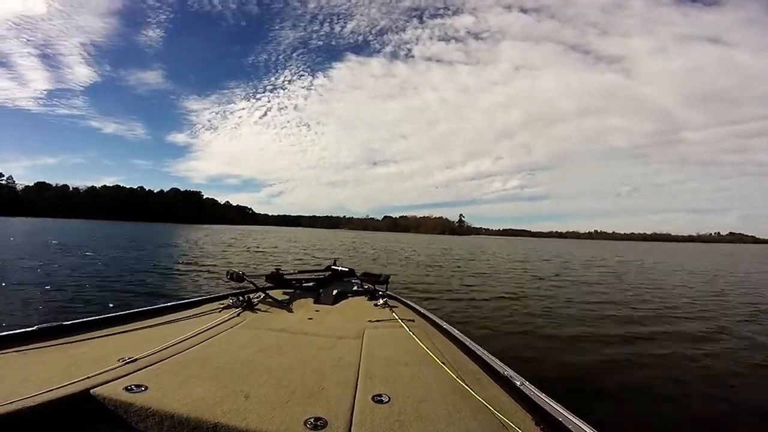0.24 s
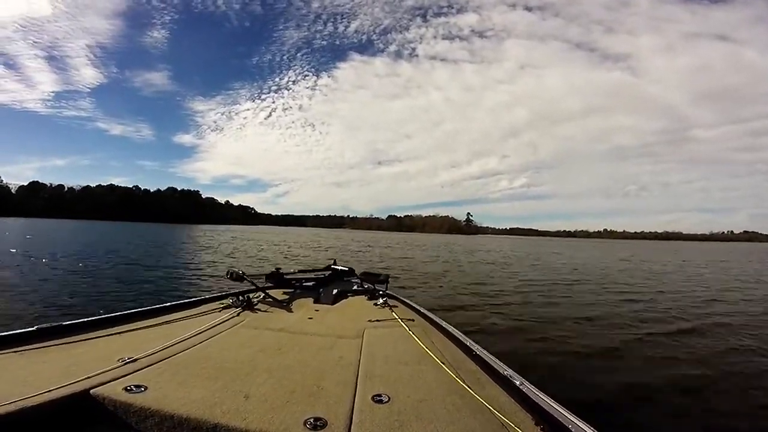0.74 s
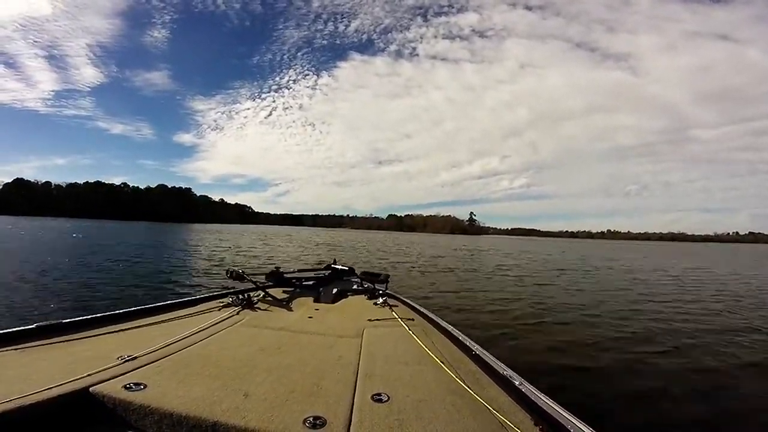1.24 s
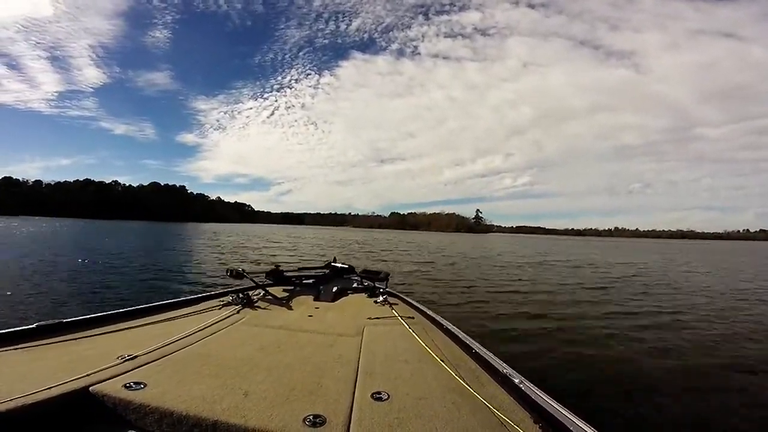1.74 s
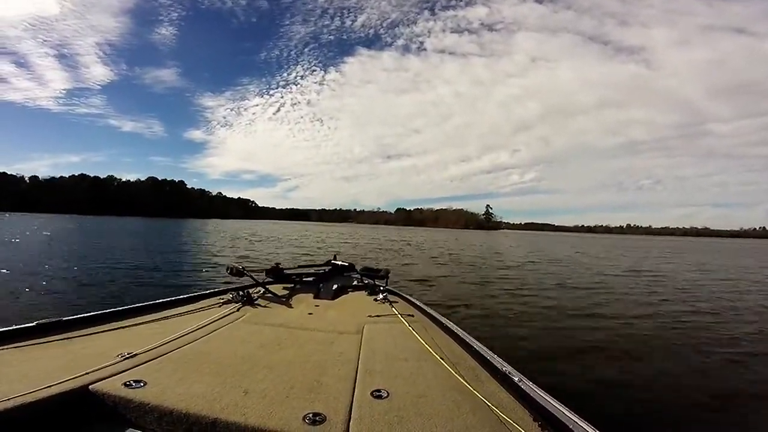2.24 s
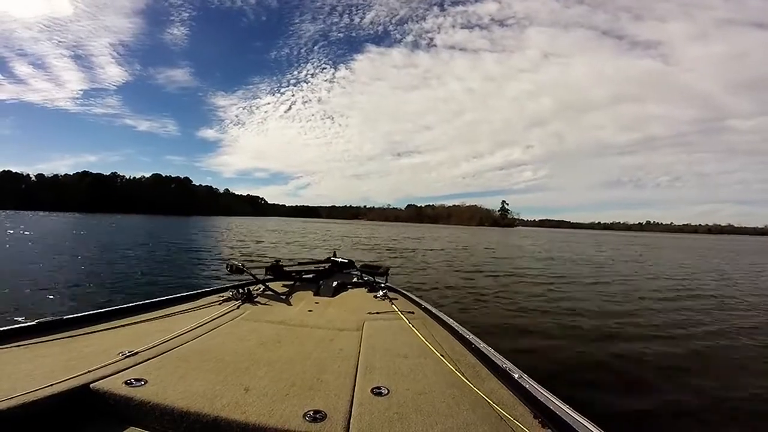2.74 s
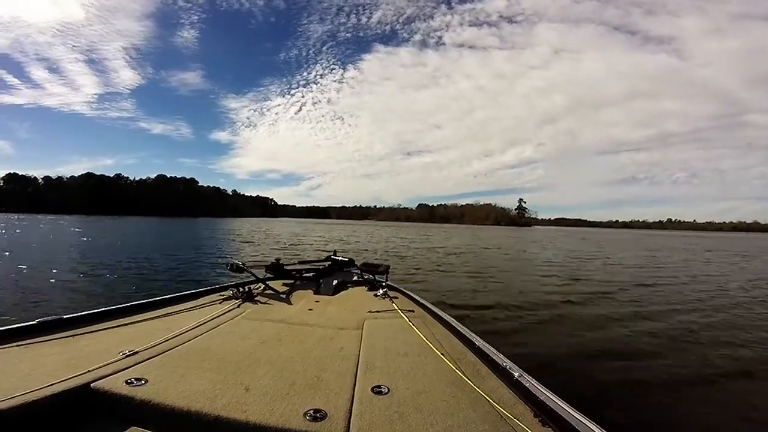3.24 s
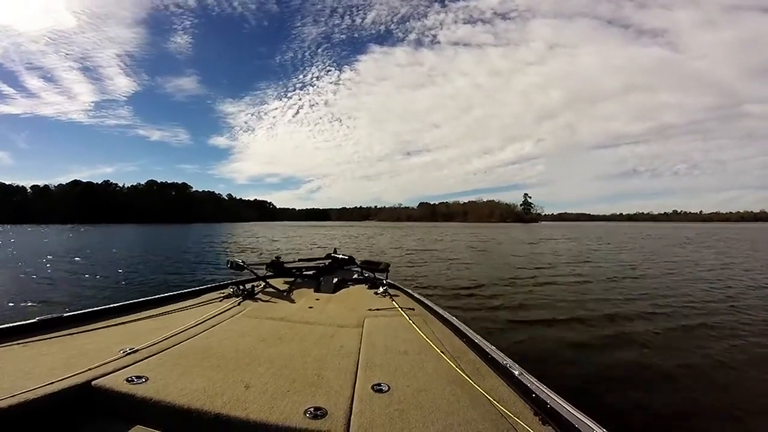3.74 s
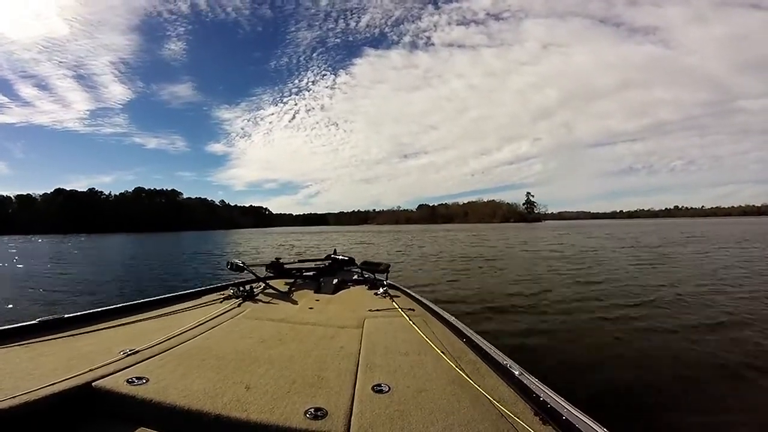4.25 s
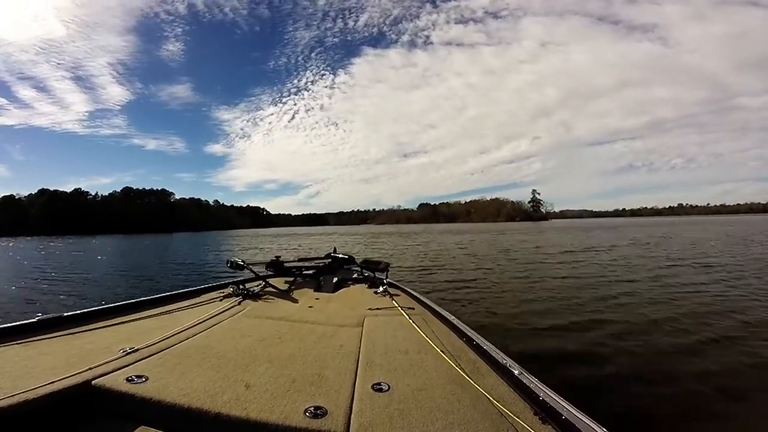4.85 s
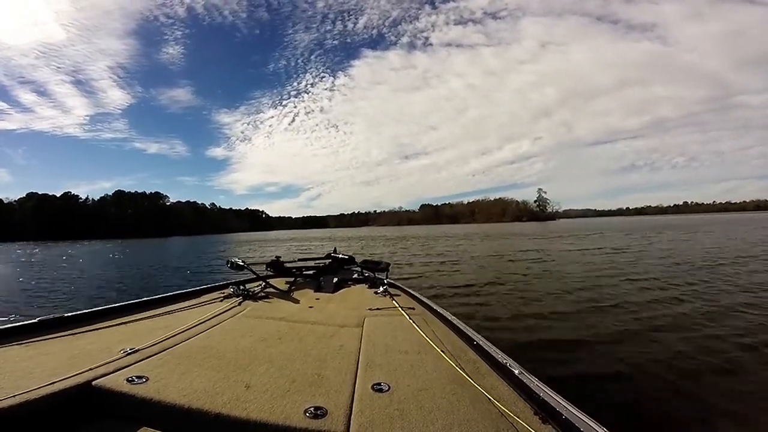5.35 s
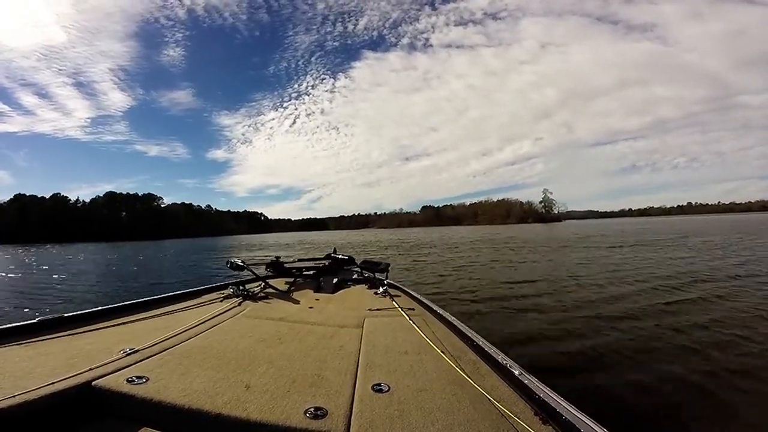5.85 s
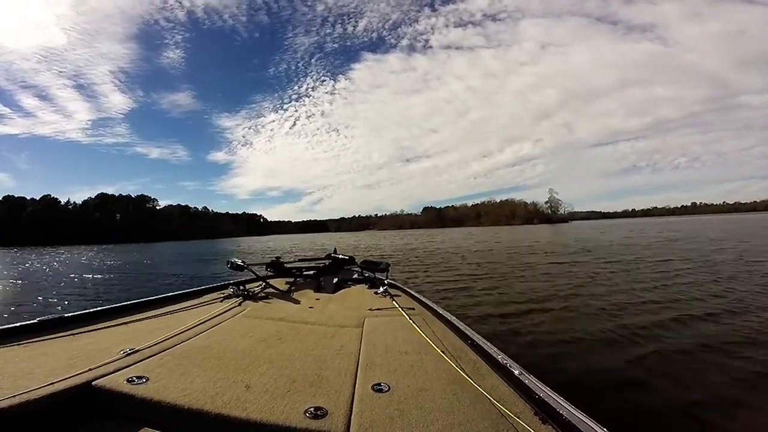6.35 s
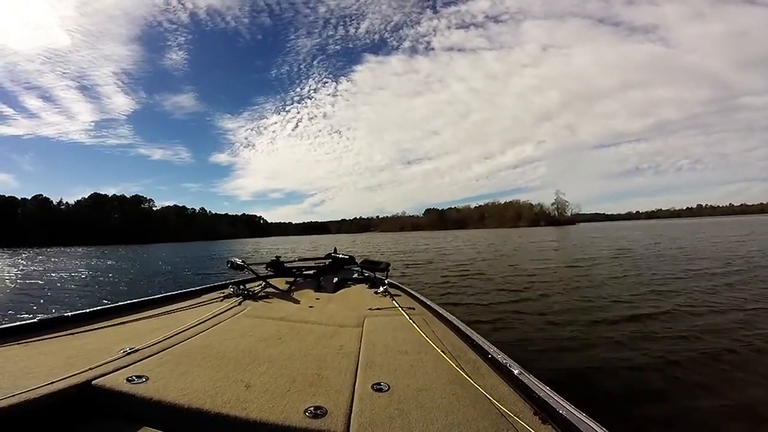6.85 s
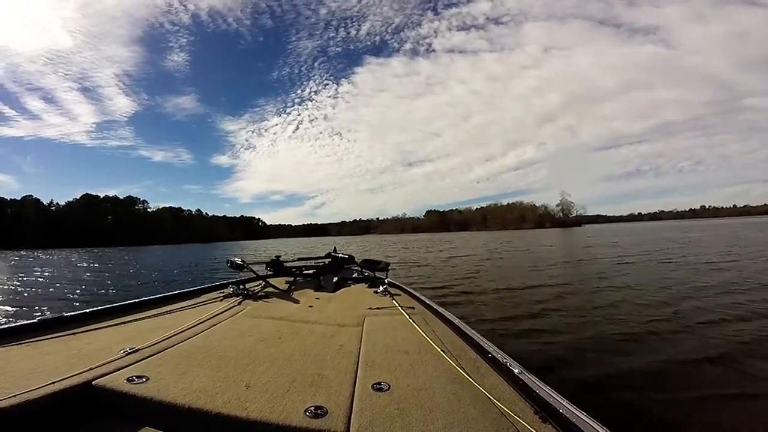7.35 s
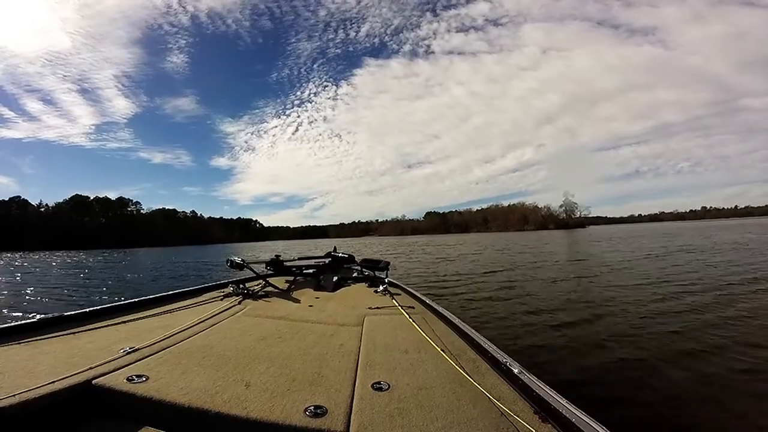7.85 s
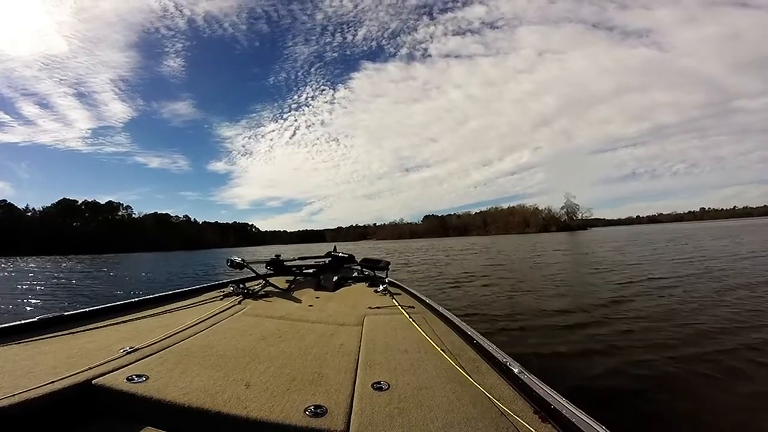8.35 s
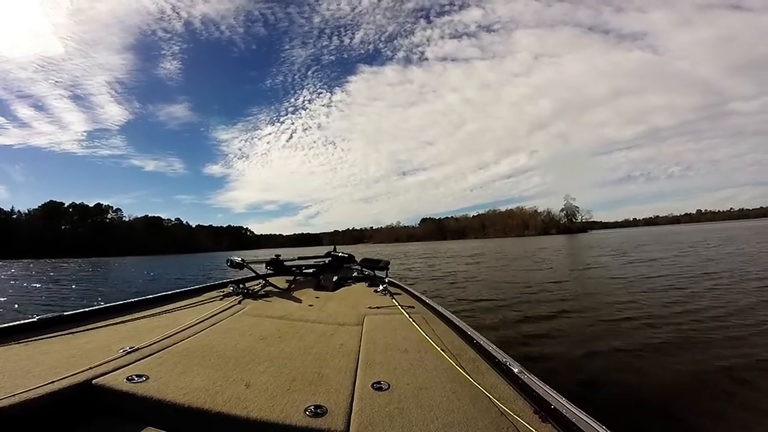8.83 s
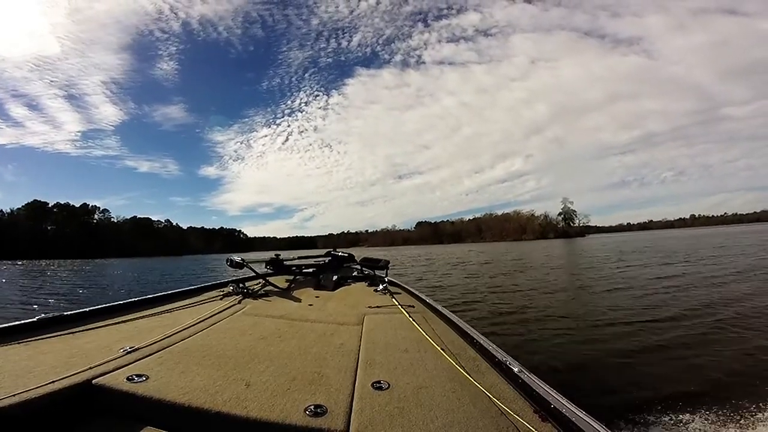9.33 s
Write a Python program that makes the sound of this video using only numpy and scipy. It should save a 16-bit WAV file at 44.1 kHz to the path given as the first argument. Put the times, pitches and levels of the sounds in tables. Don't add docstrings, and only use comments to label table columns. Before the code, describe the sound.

A fast boat slows on a lake. First a steady, boomy motor drone and uneven hard rattles, with faint hiss. Around a second and a half the pitch sags, and the engine soon fades. Waves then thud and ring through the hull in uneven low swells, with rushing water, sharp ticks of drops and gusty wind above. Late on, the wind eases and splashes come one by one. Close, muffled, hull-mounted microphone, no echo.

```python
import sys
import numpy as np
from scipy import signal
from scipy.fft import rfft, irfft, next_fast_len
from scipy.io import wavfile
from scipy.ndimage import uniform_filter1d, minimum_filter1d, map_coordinates

SR = 44100
rng = np.random.default_rng(int(sys.argv[2]) if len(sys.argv) > 2 else 0)


def wav_out(sig):
    wavfile.write(sys.argv[1], SR, np.round(np.clip(np.atleast_2d(sig).T, -1, 1) * 32767).astype(np.int16))


def natural_amplitude(level_db):
    exponent = np.asarray(level_db, float) / 20
    return 10 ** exponent


N = 422918

# time in seconds, speed in turns per second, loudness in dB.
SHAFT = [(0, 84.05, -31), (.6, 84.2, -27.5), (1.2, 83.6, -29), (1.34, 80.6, -29.5), (1.49, 73.4, -30.5),
         (1.63, 69.3, -33.5), (1.8, 67, -37), (1.95, 65.5, -51), (2.3, 63.3, -50), (2.5, 61.73, -40),
         (3.15, 54.5, -34), (3.9, 48, -69)]
# multiple of the shaft speed, level in dB, unsteadiness in dB.
ENGINE_TONES = [
    (1.717, 2.5, .7),
    (2, -3, 1),
    (3, 0, 0.3),
    (3.434, -7, 3),
    (4, 3.5, .6),
    (5, -14, 3),
]
# pitch in Hz, width in Hz, boost in dB.
DECK = [(57, 3.2, -3), (119, 4.1, 5.5), (139, 8.5, 7), (160.9, 10.5, 9.5), (203.9, 17, 6), (256.3, 3.6, 3),
        (280, 14, 0.5)]

# pitch in Hz, width in Hz, level in dB.
GEAR = [(387, 140, -2.5), (637, 110, 4), (774, 110, 0), (1040, 100, -2.5), (1280, 88, 0), (2070, 190, 2.5),
        (2580, 460, -6.5)]
# peak time in seconds, level in dB.
JOLTS = [(0, -30.5), (.18, -38), (.3, -33), (.4, -37), (.5, -34), (.72, -34), (.92, -33), (.97, -36),
         (1.14, -36), (1.3, -32), (1.42, -37)]
# time in seconds, peak in dB.
KNOCKS = [(0.0243, -17), (0.0722, -16), (0.168, -24), (0.179, -15), (0.2743, -25), (0.2967, -21),
          (0.3451, -18), (.358, -19), (0.381, -14), (0.393, -15), (0.4155, -21), (.429, -25), (.453, -23),
          (.489, -25), (0.5237, -26), (0.607, -20), (0.6893, -18), (0.9043, -17), (.916, -21), (0.952, -21),
          (0.9737, -11), (.986, -30), (1.128, -19), (1.141, -16), (1.2376, -30), (1.2495, -16),
          (1.261, -19), (1.287, -17), (1.2975, -17), (1.309, -21), (1.399, -19), (1.411, -22), (1.424, -16)]
JOLT_RISE_S, JOLT_FALL_S, RATTLE_REST_DB = 0.051, 0.052, -39.5

OFF_PLANE_S, SETTLE_S, SKIM_DB = 1.3, 0.4, -9
# start in seconds, length in seconds, level in dB, change along it in dB, pitch in Hz.
DRONE_SWELLS = [(0, 1.43, -11, -2, 85), (1.343, 0.27, -16, -3, 83.8), (1.93, 0.11, -17.5, 1, 86.05),
                (2.164, 0.16, -19, -14, 85.7), (2.339, 0.24, -11.5, 3, 84.5),
                (2.768, 0.51, -21.5, 6.5, 88.35), (3.374, 0.1, -21.5, 2, 88.8), (3.7, 0.17, -19, -0.5, 86),
                (4.048, 0.4, -15.5, 1, 86.6), (4.41, 0.37, -21.5, 4.5, 86.4),
                (4.873, 0.18, -12.5, -2.5, 88.4), (5.31, 0.04, -16.5, 0, 83.9),
                (5.43, 0.18, -16, -3.5, 87.7), (5.622, 0.07, -15.5, 2.5, 89.7),
                (6.092, 0.22, -17, -1.5, 88.6), (6.576, 0.37, -17.5, 1, 87.35), (7.045, 0.14, -22, 3, 86.5),
                (7.3, 0.08, -19.5, -1, 86), (7.488, 0.16, -15, 0.5, 88.2), (7.992, .36, -25, -14, 85.4),
                (8.435, 0.31, -20, 0, 86.7), (8.873, 0.1, -19, -5, 86.9), (9.055, 0.33, -21, 2.5, 86.5), ]
DRONE_RISE_S, DRONE_FALL_S, DRONE_REST_DB = 0.039, 0.027, -29.5

# time in seconds, shudder level in dB.
SEA = [(0, -45.5), (.45, -35.5), (.8, -39.5), (1.6, -39), (2.05, -29), (2.35, -29.5), (2.55, -36.5),
       (3.25, -32.5), (3.6, -29.5), (4.25, -33), (4.85, -27), (5.5, -28.5), (6, -35.5), (6.75, -31.5),
       (7.63, -30.5), (7.75, -39), (8.6, -33.5), (9.59, -39.5)]
# start in seconds, length in seconds, boom level in dB, upper boom above that in dB.
WAVES = [(0, 0.12, -16.5, -2), (.6, 0.29, -10, -10), (1.097, 0.38, -13.5, -9), (2.036, 0.22, -14, -14),
         (2.283, 0.096, -17, -19), (3.29, 0.011, -16, -3), (3.485, 0.19, -21.5, 2),
         (3.787, 0.41, -16, -4.5), (4.35, 0.18, -17.5, -9), (4.915, 0.073, -12, -7),
         (5.077, 0.033, -17, -9), (5.208, 0.17, -15.5, -7), (5.418, 0.075, -13, -5),
         (5.63, 0.11, -16.5, -10), (5.823, 0.067, -13, -1), (5.979, 0.26, -16, -7.5),
         (6.336, 0.07, -19.5, -4), (6.543, 0.14, -15.5, -15), (6.747, 0.46, -17.5, -4),
         (7.149, 0.21, -14.5, -7), (7.417, 0.14, -16, -3), (7.887, 0.069, -17.5, -1), (8.1, 0.033, -23, 4),
         (8.33, 0.42, -18.5, -5), (8.699, 0.09, -16, -5), (8.83, 0.24, -21.5, -9)]
WAVE_RISE_S, WAVE_EBB_S = 0.14, 0.18
BOOM_DB, BOOM_FOLLOWS = -16, 0.14
UPPER_DB, UPPER_FOLLOWS = -21, 0.076
SLAP_DB = -5
# frequency in Hz, level in dB per Hz.
SHUDDER = [(15, -43), (25, -19.5), (40, 0.5), (62, 6), (78, 5), (100, -24), (130, -64.5)]
# frequency in Hz, level in dB per Hz.
BOOM = [(60, -60), (85, -14), (100, 4), (165, -4), (190, -12.5), (240, -72)]
# frequency in Hz, level in dB per Hz.
UPPER_BOOM = [(140, -45), (180, -2), (250, -8), (310, -19.5), (400, -28), (520, -36), (800, -73.5)]

# pitch in Hz, width in Hz, boost (+) or dip (-) in dB.
CASE = [(1929, 98, 8), (2160, 406, -11), (2550, 920, 6.5), (3001, 490, -23.5), (3440, 350, 16.5),
        (3817, 360, -23), (4108, 424, 19), (4770, 270, 9.5), (5104, 430, -12), (6194, 195, 13.5),
        (6270, 89, -9.5), (6624, 226, 21.5), (8230, 190, -3), (8350, 240, 10.5), (10000, 300, -2.5),
        (10570, 280, 11.5), (11500, 250, -10.5)]
# time in seconds, strength in dB, how much it blows from the side from 0 to 1.
WIND = [(0, -54, 0.13), (.88, -54, 0.2), (.97, -57, 0.16), (1.3, -56, 0.28), (2.26, -46, 0.1),
        (2.5, -51.5, 0.18), (3.16, -50, 0.52), (3.46, -53, 0.7), (3.85, -48.5, 0.81), (4.33, -54, 0.83),
        (5.25, -51.5, 0.69), (5.49, -57, 0.75), (5.84, -53.5, 0.82), (6.02, -60.5, 0.86), (6.6, -52, 0.78),
        (7.43, -58.5, 0.67), (7.64, -66, 0.35), (8.44, -61.5, 0)]
# peak time in seconds, strength in dB.
PUFFS = [(.91, -51), (1.0, -63), (1.13, -51.5), (1.3, -52.5), (1.37, -53), (1.44, -55.5), (1.7, -52.5),
         (1.84, -49), (2.26, -58), (3.39, -59.5), (3.7, -53.5), (3.78, -54.5), (3.87, -54.5), (3.97, -48.5),
         (4.02, -46.5), (4.1, -51), (4.62, -60.5), (4.84, -64.5), (5.2, -56), (5.94, -63.5), (6.11, -53),
         (6.45, -56.5), (6.58, -47), (6.63, -58.5), (6.7, -53.5), (6.73, -56), (7.25, -66)]
PUFF_S = 0.015
# frequency in Hz, level in dB per Hz.
ROAR = [(250, -7), (400, 0), (1000, -2.5), (1900, -4.5), (2300, -2), (3500, -36.5), (5000, -54.5)]
# frequency in Hz, level in dB per Hz.
WHISTLE = [(3500, -49), (5000, 2), (6000, -2), (7000, -7), (8000, -10), (10000, -50)]
# frequency in Hz, level in dB per Hz.
HISS = [(5500, -51.5), (7200, -5.5), (9000, 1), (10000, -6.5), (11500, -7.5), (13000, -16), (14200, -22),
        (14800, -22.5), (16000, -34)]
ROAR_DB, ROAR_FOLLOWS, ROAR_ABEAM_DB = -39, 0.78, 2
WHISTLE_OVER_DB, WHISTLE_ABEAM_DB, HISS_OVER_DB = 4, 10, 2

# time in seconds, flow level in dB.
WATER = [(0, -43), (1.04, -43), (1.52, -41), (2.26, -33), (2.47, -38.5), (2.9, -36.5), (3.51, -37),
         (3.85, -35), (4.25, -36), (5.31, -33.5), (5.49, -37.5), (6.16, -38.5), (6.56, -36), (7.32, -36),
         (7.69, -41.5), (8.4, -40), (9.2, -43.5), (9.59, -48.5)]
# peak time in seconds, level in dB, brightness in dB.
SPLASHES = [(4.75, -43, 7), (6.52, -43, 7), (6.85, -49, 7), (7.09, -44, 4), (7.32, -42, 9.5),
            (7.66, -49, 10), (7.78, -50, 6), (7.89, -47.5, 12), (8.0, -45, 8.5), (8.27, -40, 3.5),
            (8.35, -33.5, -10), (8.45, -38, -9), (8.54, -49, -8), (8.75, -35, -8), (8.83, -39.5, 1.5),
            (8.9, -40, 5), (9.23, -40, -11), (9.3, -37, -6), (9.34, -44, -7), (9.42, -41, -18),
            (9.5, -35.5, -17), (9.56, -38.5, -12)]
SPLASH_S = 0.029
# frequency in Hz, level in dB per Hz.
WASH = [(1500, -48), (2150, 1), (2500, 7), (2950, 1.5), (3300, -12), (4200, -57)]
# frequency in Hz, level in dB per Hz.
BRIGHT_WASH = [(2300, -61), (3050, -7.5), (3400, 1.5), (3800, -3.5), (4800, -47)]
# frequency in Hz, level in dB per Hz.
SIDE_WASH = [(2800, -47), (3800, -1.5), (4400, -10), (5000, -6.5), (6500, -52)]
# frequency in Hz, level in dB per Hz.
GURGLE = [(450, -32.5), (650, 3), (1200, -5.5), (1600, -13.5)]
BRIGHT_OVER_DB, BRIGHT_ABEAM_DB = -5.5, 3
SIDE_OVER_DB, SIDE_ABEAM_DB = -12.5, 8
GURGLE_DB = -51

# time in seconds, peak in dB, pitch in Hz.
DROPS = [(1.5498, -13.5, 1950), (1.946, -5.5, 2550), (1.9627, -7, 1900), (2.2379, -22, 2450),
         (2.371, -12, 2520), (2.4246, -12, 2575), (2.8877, -17, 2500), (3.603, -8, 2594),
         (3.8374, -9, 2480), (4.038, -10, 2580), (6.6583, -14, 3405), (7.0636, -14, 3454),
         (8.046, -17, 2669), (8.2506, -26, 2580), (9.2144, -19, 2694), (3.0192, -19, 2600),
         (3.7141, -12, 2500), (3.7585, -12, 2440), (3.8957, -12, 2650), (3.912, -8, 2590),
         (4.1915, -11, 2640), (4.4579, -19, 3440), (4.8879, -13, 3340), (5.2782, -16, 3385),
         (6.2922, -14, 3502), (6.44, -15, 4043), (6.9792, -15, 2671), (7.722, -15.5, 3380),
         (8.0762, -16, 2590), (8.4552, -17, 2669), (8.8953, -15, 3380), (9.303, -15, 2510),
         (1.009, -17, 2550)]
DROP_S = 0.002

# start in seconds, hold in seconds, level in dB, pitch in Hz.
RINGS = [(2.128, 0.026, -25, 144.7), (2.305, 0.024, -10, 135), (2.392, 0.026, -16, 142.3),
         (3.292, 0.013, -16.5, 174), (3.599, 0.12, -22, 207.3), (3.667, 0.063, -19.5, 105),
         (3.703, 0.12, -22.5, 197.2), (3.962, 0.097, -15.5, 119), (4.125, 0.038, -21.5, 209.7),
         (4.187, 0.022, -17.5, 141), (4.915, 0.015, -19, 206.5), (4.95, 0.023, -9, 160.8),
         (5.085, 0.013, -11, 162.3), (5.091, 0.026, -18.5, 205), (5.213, 0.11, -23.5, 209.1),
         (5.254, 0.015, -14, 154.4), (5.44, 0.06, -11.5, 162), (5.644, 0.024, -13, 104.4),
         (5.821, 0.08, -18.5, 215.7), (5.821, 0.13, -35, 201), (5.883, 0.029, -12, 157.6),
         (5.962, 0.035, -15, 154.7), (6.167, 0.017, -18, 206.9), (6.288, 0.041, -22.5, 209),
         (6.347, 0.043, -13.5, 161.5), (6.524, 0.13, -18, 157.7), (6.524, 0.17, -19, 149),
         (6.714, 0.052, -21, 214), (6.738, 0.015, -16, 110), (7.064, 0.022, -20, 198),
         (7.064, 0.085, -12.5, 149.2), (7.214, 0.017, -15.5, 201), (7.295, 0.038, -14, 137),
         (7.313, 0.021, -17, 110), (7.445, 0.027, -15.5, 114.2), (7.472, 0.047, -20, 145),
         (7.476, 0.18, -15, 158.9), (7.612, 0.034, -12.5, 137.3), (7.862, 0.03, -16, 140.0),
         (7.899, 0.014, -17, 210), (8.094, 0.017, -16.5, 161), (8.112, 0.015, -11, 206),
         (8.22, 0.043, -17, 203), (8.41, 0.043, -16.5, 142.7), (8.537, 0.031, -15, 116.3),
         (8.731, 0.018, -16, 128), (8.76, 0.099, -20, 204.2), (8.958, 0.024, -18.5, 200.3)]
# start in seconds, hold in seconds, level in dB, pitch in Hz.
SMALL_RINGS = [(1.932, 0.037, -17.5, 105), (2.17, 0.029, -22.5, 204.5), (2.702, 0.12, -26, 232),
               (2.899, 0.018, -18, 141.6), (3.091, 0.029, -31, 201), (3.285, 0.023, -21, 157),
               (3.575, 0.021, -18, 149), (3.63, 0.038, -19, 165), (3.869, 0.027, -20, 117),
               (3.903, 0.092, -20, 157.7), (3.934, 0.029, -28, 208), (4.478, 0.015, -20, 162),
               (4.543, 0.047, -30, 239), (4.568, 0.023, -18, 154), (4.6, 0.022, -21.5, 212.4),
               (4.675, 0.019, -17.5, 135), (4.923, 0.061, -29, 261), (5.072, 0.02, -23, 235),
               (5.09, 0.029, -27, 259), (5.192, 0.031, -24, 229.6), (5.215, 0.017, -15.5, 114),
               (5.245, 0.098, -21.5, 177), (5.373, 0.067, -31, 264.4), (5.626, 0.13, -19, 153.1),
               (5.671, 0.075, -27, 214.6), (5.707, 0.02, -19.5, 190), (5.797, 0.02, -30, 283),
               (6.174, 0.012, -22, 154.5), (6.229, 0.015, -21, 110), (6.516, 0.02, -28, 255),
               (6.6, 0.018, -16.5, 114), (6.73, 0.018, -28, 266.4), (6.73, 0.021, -26, 234),
               (6.737, 0.15, -19.5, 119.8), (6.878, 0.032, -29, 234), (6.905, 0.019, -21, 199.2),
               (6.946, 0.062, -17.5, 152.1), (7.015, 0.047, -27, 242.4), (7.134, 0.23, -24, 219.5),
               (7.326, 0.022, -30, 248), (7.388, 0.093, -19.5, 154.6), (7.517, 0.098, -23.5, 202.5),
               (7.676, 0.16, -21.5, 138.6), (7.726, 0.075, -24.5, 206.5), (8.073, 0.02, -21, 126.5),
               (8.388, 0.033, -18.5, 162), (8.737, 0.023, -16.5, 170.9), (8.81, 0.078, -22, 155),
               (4.12, 0.087, -20.5, 155), (8.3, 0.096, -24, 150.5), (8.95, .1, -24, 135),
               (2.58, 0.1, -20, 140.3)]
RING_RISE_S, RING_FALL_S, RING_DB = 0.021, 0.022, -0.5

# time in seconds, level in dB.
STERN = [
    (0, -80),
    (7.2, -80),
    (7.7, -63.5),
    (8.3, -56.5),
    (8.8, -56.5),
    (9.2, -55.5),
    (9.59, -54.5),
]
# frequency in Hz, level in dB per Hz.
SPRAY = [(3500, -43.5), (5300, 0), (7400, -4), (9300, -8.5), (10000, -14.5), (12100, -15), (13600, -13),
         (14100, -21), (14700, -17), (15300, -35)]


def unit(x):
    return x / np.sqrt(np.mean(x ** 2) + 1e-20)


def curves(rows):
    s, *columns = np.transpose(rows)
    return [np.interp(np.arange(N) / SR, s, column) for column in columns]


def wobble(rate):
    knots = rng.standard_normal(int(N * rate / SR) + 4)
    return map_coordinates(knots, [np.arange(N) * rate / SR])


def swells(s, db, rise_s, fall_s, rest_db, length=0, change_db=0):
    t = np.arange(0, N + 200, 200) / SR
    late = t[:, None] - s
    top_db = db + change_db * np.clip(late / (length + 1e-9), 0, 1)
    slope = np.maximum(-late / rise_s, np.maximum(late - length, 0) / fall_s)
    power = natural_amplitude(2 * (top_db - 10 * slope)).max(axis=1)
    return 10 * np.log10(np.interp(np.arange(N) / SR, t, power) + natural_amplitude(2 * rest_db))


def filtered(x, response):
    m = next_fast_len(N + SR // 2)
    return irfft(rfft(x, m) * response(np.fft.rfftfreq(m, 1 / SR)), m)[:N]


def body(modes):
    f = np.fft.rfftfreq(next_fast_len(N + SR // 2), 1 / SR)
    out = np.ones(len(f), complex)
    for hz, width, db in modes:
        spring = hz * hz - f * f
        loss = 1j * f * width
        out *= (spring + loss * natural_amplitude(max(db, -17))) / (spring + loss)
    return out


def rush(spectrum, response, level_db, flutter_db, flutter_rate, shared=0):
    f, db = np.transpose(spectrum)
    noise = rng.standard_normal(N) * natural_amplitude(flutter_db * (wobble(flutter_rate) + shared))

    def colour(hz):
        return natural_amplitude(np.interp(np.log(hz + 1), np.log(f), db, -120, -120)) * response

    return natural_amplitude(level_db) * unit(filtered(noise, colour))


def settling():
    return np.clip((np.arange(N) / SR - OFF_PLANE_S) / SETTLE_S, 0, 1)


def engine(turns, load_db):
    tones = np.zeros(N)
    for multiple, db, shake_db in ENGINE_TONES:
        level = natural_amplitude(db + shake_db * wobble(14))
        tones += level * np.sin(2 * np.pi * multiple * turns + .1 * wobble(12))
    deck = body(DECK)
    return filtered(natural_amplitude(load_db) * tones, lambda f: deck * (.09 + 1 / (1 + (f / 255) ** 20)))


def rattle(turns):
    size_db = 1.4 * rng.standard_normal(int(turns[-1]) + 1)[turns.astype(int)]
    bursts = natural_amplitude(size_db - 50 * (turns % 1)) * rng.standard_normal(N)

    def ring(f):
        total = 0
        for k, (hz, width, db) in enumerate(GEAR):
            loss = 1j * f * width
            total = total + (-1) ** k * natural_amplitude(db) * loss / (hz * hz - f * f + loss)
        return total

    def soft_contact(f):
        return ring(f) * (f / 2200) ** .8 / (1 + 1j * f / 4500) ** 3

    blows, t = np.zeros(N), np.arange(SR // 100) / SR
    for s, db in KNOCKS:
        blow = .1 * rng.standard_normal(len(t)) + (t == 0)
        blows[round(s * SR):][:len(t)] += natural_amplitude(db + 23 - 60 * t / .003) * blow
    still_db = -60 * np.clip(np.arange(N) / SR - OFF_PLANE_S, 0, 1)
    level_db = swells(*np.transpose(JOLTS), JOLT_RISE_S, JOLT_FALL_S, RATTLE_REST_DB + still_db)
    return natural_amplitude(level_db - 4.5) * unit(filtered(bursts, ring)) + filtered(blows, soft_contact)


def hull_drone(speed):
    settled, t = settling(), np.arange(N) / SR
    s, length, db, change_db, hz = np.transpose(DRONE_SWELLS)
    drone_db = swells(s, db, DRONE_RISE_S, DRONE_FALL_S, DRONE_REST_DB, length, change_db)
    loose = np.clip(np.minimum(.2 + .8 * settled, (-8 - drone_db) / 7), .2, 1)
    pitch = settled * np.interp(t, s + length / 2, hz) + (1 - settled) * speed
    cycles = np.cumsum(pitch) / SR + .13
    level = np.sqrt(2) * natural_amplitude(drone_db + 1.6 * loose * wobble(23))
    return level * np.sin(2 * np.pi * cycles + 0.45 * loose * wobble(14))


def wave_slap():
    settled, deck, sea_db = settling(), body(DECK), curves(SEA)[0]
    swing_db, planing_db = sea_db - sea_db.mean(), SKIM_DB * (1 - settled)
    s, length, db, over_db = np.transpose(WAVES)
    boom_rest_db = BOOM_DB + BOOM_FOLLOWS * swing_db
    upper_rest_db = UPPER_DB + UPPER_FOLLOWS * swing_db
    boom_db = swells(s, db, WAVE_RISE_S, WAVE_EBB_S, boom_rest_db, length)
    upper_db = swells(s, db + over_db, WAVE_RISE_S, WAVE_EBB_S, upper_rest_db, length)
    boom = rush(BOOM, deck, boom_db + SLAP_DB + planing_db, 2 * settled, 12)
    upper = rush(UPPER_BOOM, deck, upper_db + SLAP_DB + 0.76 * planing_db, 2 * settled, 14)
    return boom + upper + rush(SHUDDER, deck, sea_db + 5.5, 0.99, 6.8)


def wind(gust, case):
    air_db, abeam = curves(WIND)
    air_db = swells(*np.transpose(PUFFS), PUFF_S, PUFF_S, air_db)
    roar_db = ROAR_DB + ROAR_FOLLOWS * (air_db - air_db.mean()) + ROAR_ABEAM_DB * (abeam - .5)
    whistle_db = air_db + WHISTLE_OVER_DB + WHISTLE_ABEAM_DB * abeam
    roar = rush(ROAR, case, roar_db, 0.6, 15, gust)
    whistle = rush(WHISTLE, case, whistle_db, 0.73, 12, gust)
    return roar + whistle + rush(HISS, case, air_db + HISS_OVER_DB, 0.9, 10, gust)


def water(gust, case):
    abeam, flow_db = curves(WIND)[1], curves(WATER)[0]
    s, db, brightness_db = np.transpose(SPLASHES)
    wash_db = swells(s, db, SPLASH_S, SPLASH_S, flow_db)
    bright_rest_db = flow_db + BRIGHT_OVER_DB + BRIGHT_ABEAM_DB * abeam
    bright_db = swells(s, db + brightness_db, SPLASH_S, SPLASH_S, bright_rest_db)
    side_db = flow_db + SIDE_OVER_DB + SIDE_ABEAM_DB * abeam
    choppy_db = curves([(0, 1.73), (7.3, 0.66), (7.8, 1.4)])[0]
    wash = rush(WASH, case, wash_db, choppy_db, 45, 0.62 * gust / choppy_db)
    bright = rush(BRIGHT_WASH, case, bright_db, choppy_db, 45, 0.38 * gust / choppy_db)
    side = rush(SIDE_WASH, case, side_db, 0.58, 14, gust)
    return wash + bright + side + rush(GURGLE, case, GURGLE_DB, 0.42, 22, gust)


def drops():
    out, t = np.zeros(N + SR), np.arange(SR // 20) / SR
    for s, db, hz in DROPS:
        shape = t / DROP_S * np.exp(1 - t / DROP_S)
        out[round(s * SR):][:len(t)] += natural_amplitude(db - 13.5) * shape * np.sin(2 * np.pi * hz * t)
    return out[:N]


def deck_rings():
    out, t = np.zeros(N + SR), np.arange(SR // 2) / SR - .1
    for s, hold, db, hz in list(RINGS) + list(SMALL_RINGS):
        start, sway = rng.uniform(0, 2 * np.pi, 2)
        rise = (np.minimum(t, 0) / RING_RISE_S) ** 2
        fall = (np.maximum(t - hold, 0) / RING_FALL_S) ** 2
        tone = np.sqrt(2) * np.sin(2 * np.pi * hz * t + start + 0.43 * np.sin(40 * t + sway))
        out[round((s + t[0]) * SR):][:len(t)] += natural_amplitude(db + RING_DB) * np.exp(-rise - fall) * tone
    return out[:N]


def stern_spray(gust):
    return rush(SPRAY, 1, curves(STERN)[0], 0.76, 15, gust)


def scene():
    speed, load_db = curves(SHAFT)
    turns = np.cumsum(speed) / SR
    gust = 0.26 * wobble(18) + 0.5 * wobble(28) + 0.2 * wobble(11)
    case = body(CASE)
    through_hull = engine(turns, load_db) + rattle(turns) + hull_drone(speed) + wave_slap()
    through_case = wind(gust, case) + water(gust, case) + drops()
    return (through_hull + through_case + deck_rings() + stern_spray(gust))[None]


def top_cut(x):
    return signal.sosfilt(signal.butter(12, 15150, fs=SR, output="sos"), x)


def record(dry):
    need = np.minimum(1, .82 / (np.abs(dry) + 1e-9))
    gain = uniform_filter1d(minimum_filter1d(need, size=1400), size=1200)
    ending = np.clip(np.arange(N)[::-1] / 150, 0, 1)
    return top_cut(dry * gain * ending)


dry = scene()
out = record(dry)
wav_out(out)
```